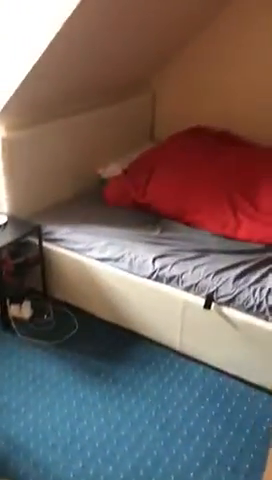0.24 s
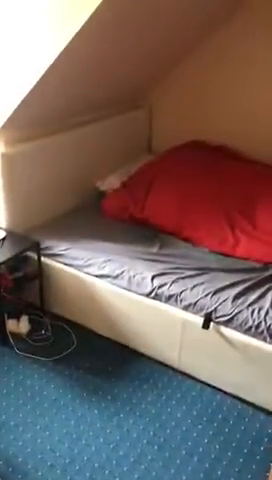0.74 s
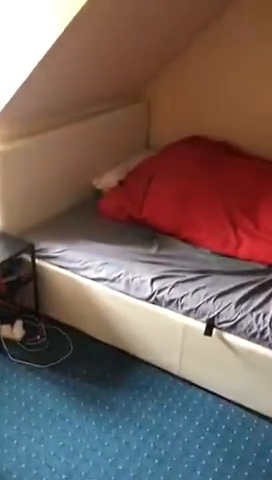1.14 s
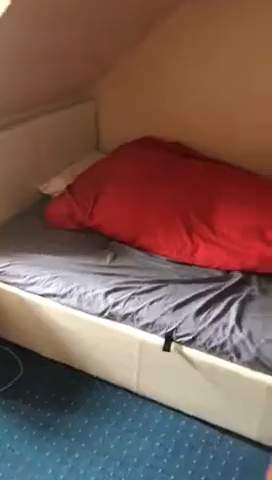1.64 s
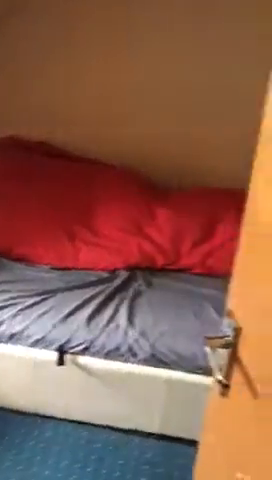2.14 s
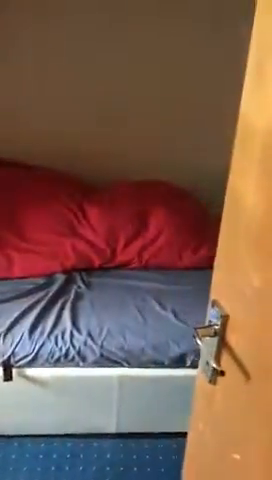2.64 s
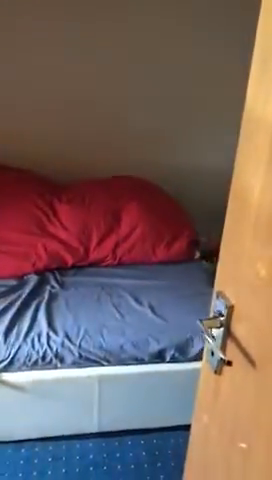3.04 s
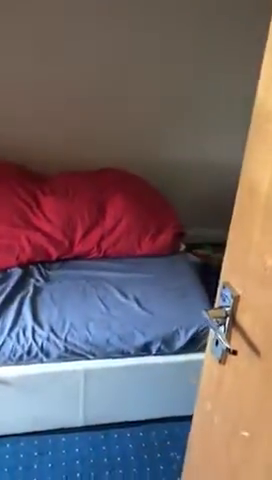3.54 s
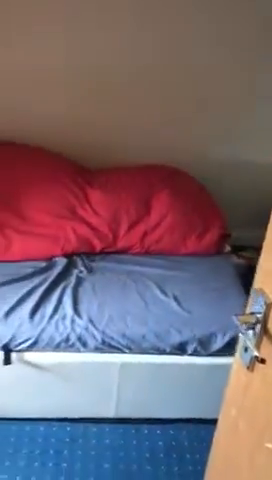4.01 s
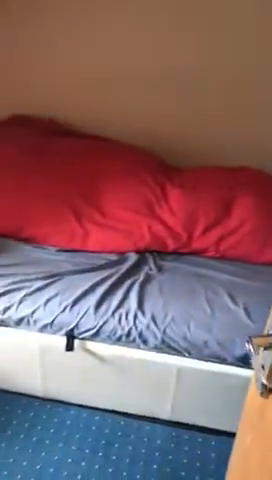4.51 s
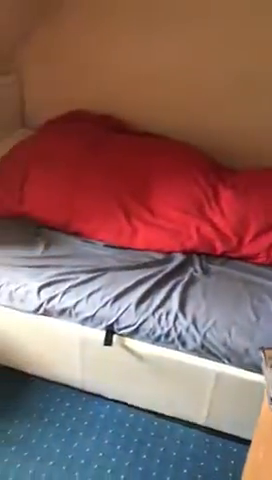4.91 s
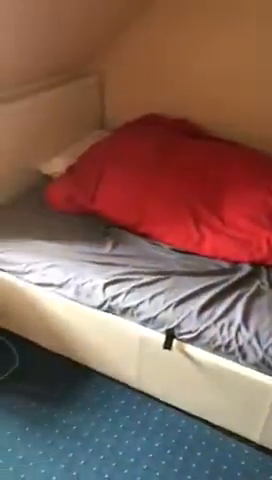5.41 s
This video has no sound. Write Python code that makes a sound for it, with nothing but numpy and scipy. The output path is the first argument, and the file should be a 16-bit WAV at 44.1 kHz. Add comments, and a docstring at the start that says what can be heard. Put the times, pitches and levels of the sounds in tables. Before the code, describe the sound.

For the first 1.5 seconds, footsteps climb carpeted wooden stairs a little way off, the treads knocking hollowly and groaning low under the weight. Around 0.8 seconds a few small knocks and a rub sound right at the microphone, and a light snap follows at 1.2. Cloth brushes softly throughout, most clearly near 1.9 seconds. From about 2.1 to 2.8 seconds, louder heel thuds come in a quick cluster on a carpeted bedroom floor, each with a short boom and a low timber rumble. A door handle ticks faintly at 3 seconds, and two more steps land at about 3.3 and 3.5. After a lull, something snaps sharply at 4.5 seconds, followed by the last dull steps between 4.7 and 5. The room sounds small, with a faint murmur of still air until the end at about 5.5 seconds.

```python
"""Footsteps up carpeted stairs and across a bedroom

Wooden treads knock hollowly at a distance and groan under load. In the small carpeted bedroom each
heel sends a thud through the joist floor, which booms back a moment later; the timbers rumble.
Cloth brushes, a few small knocks sound right at the microphone, something snaps and a door handle
ticks, over the murmur of still air."""
import sys
import numpy as np
from scipy import signal
from scipy.fft import rfft, irfft, next_fast_len
from scipy.io import wavfile
from scipy.ndimage import uniform_filter1d

SR = 44100
rng = np.random.default_rng(int(sys.argv[2]) if len(sys.argv) > 2 else 0)


def materialize(psi):
    """Save the field psi as 16-bit PCM at rate SR to the path in sys.argv[1].

    A 1-D psi becomes a single channel; in a 2-D psi each row is a channel.
    """
    bounded = np.clip(np.atleast_2d(psi).T, -1, 1)
    quanta = np.round(bounded * 32767).astype(np.int16)
    wavfile.write(sys.argv[1], SR, quanta)


N = 249601
TIME_S = np.arange(N) / SR
RING_S = TIME_S[:next_fast_len(SR // 2)]   # time axis of one blow


def from_db(db):
    """Decibels to gain."""
    return np.exp(np.asarray(db) * (np.log(10) / 20))


def rms_one(x):
    """Scale to unit rms."""
    return x / np.sqrt(np.mean(x ** 2) + 1e-20)


def at_hz(points, hz):
    """Read a table on a log-frequency axis."""
    freq_hz, value = np.transpose(points)
    return np.interp(np.log(np.maximum(hz, 1)), np.log(freq_hz), value)


def add(out, start_s, sound):
    """Mix a sound in at start_s."""
    i = max(round(start_s * SR), 0)
    out[i:i + len(sound)] += sound[:N - i]


def low_pass(x, hz):
    """Second-order treble cut: the softer the contact, the lower the corner."""
    return signal.sosfilt(signal.butter(2, min(hz, .45 * SR), fs=SR, output="sos"), x)


def high_pass(x, hz):
    """Second-order bass cut."""
    return signal.sosfilt(signal.butter(2, hz, "high", fs=SR, output="sos"), x)


def noise(spectrum, size):
    """Steady noise of a given spectral shape, rms 1."""
    padded = next_fast_len(size, True)
    hz = np.fft.rfftfreq(padded, 1 / SR)
    phases = np.exp(2j * np.pi * rng.random(len(hz)))
    return rms_one(irfft(phases * from_db(at_hz(spectrum, hz)), padded)[:size])


def swell(peak_s, rise_s, fall_s):
    """Stroke envelope: exponential rise and fall, given as time constants."""
    exponent = np.minimum((TIME_S - peak_s) / rise_s, (peak_s - TIME_S) / fall_s)
    return np.exp(np.maximum(exponent, -40))


def wave(pitch_hz, level_db, arrival_s, swell_s):
    """Heavily damped bending wave: arrives, peaks swell_s later, fades."""
    age_s = np.maximum(RING_S[RING_S < arrival_s + 10 * swell_s] - arrival_s, 0)
    envelope = (age_s / swell_s * np.exp(1 - age_s / swell_s)) ** 2
    packet = from_db(level_db) * envelope * np.sin(2 * np.pi * pitch_hz * age_s)
    return np.pad(packet, (0, len(RING_S) - len(age_s)))


def struck(waves, detune, vary_db):
    """Each blow lands on another spot, so every wave varies in pitch and strength."""
    scatter = rng.standard_normal((len(waves), 2))
    return sum(wave(pitch_hz * (1 + detune * a), level_db + vary_db * b, arrival_s, swell_s)
               for (pitch_hz, level_db, arrival_s, swell_s), (a, b) in zip(waves, scatter))


# Room decay: band_hz, t60_s
ROOM_DECAY = [(60, 0.68), (150, 0.42), (350, 0.29), (700, 0.2), (1500, 0.18), (4000, 0.15), (12000, 0.15)]

def room_tails(spectrum, build_s, count):
    """Dense reflections, one row per blow: they build up, then each band dies at its own rate."""
    size = len(RING_S)
    spectra = rfft([noise(spectrum, size) for _ in range(count)])
    hz = np.fft.rfftfreq(size, 1 / SR)
    bands_hz, t60s_s = np.transpose(ROOM_DECAY)
    tails = np.zeros((count, size))
    for t60_s, share in zip(t60s_s, np.eye(len(t60s_s))):
        band = irfft(spectra * at_hz(np.c_[bands_hz, share], hz), size)
        tails += band * from_db(-60 * RING_S / t60_s)
    return tails * (1 - np.exp(-RING_S / build_s))


# Air and hiss: freq_hz, density_db
AIR_SPECTRUM = [(25, -15), (45, -20), (65, -11.5), (90, -3), (130, -5.5), (190, -4.5), (260, -2.5),
                (400, -7), (620, -8), (1000, -12), (1600, -16.5), (4000, -27), (8000, -26), (12000, -30)]

def still_air(level_db):
    """Even murmur of the house's air, plus microphone hiss."""
    return from_db(level_db) * noise(AIR_SPECTRUM, N)


# Soft low thumps and the fading rumble of a footstep: start_s, level_db
LOW_THUMPS = [(0, -56), (.91, -64), (1.83, -61.5), (3.65, -59), (4.0, -65), (4.8, -53.5), (5.08, -68)]
# Timber rumble: freq_hz, density_db
RUMBLE_SPECTRUM = [(20, -16), (45, -4.5), (70, 2.5), (110, -0.5), (150, -5), (250, -18.5), (600, -61)]

def timbers(rest_db, step_gain_db, load_gain_db, attack_s, t60_s):
    """Every footfall, soft thump and loaded tread stirs a low rumble in the house."""
    pushes = [(start_s, level_db + boom_db + step_gain_db)
              for start_s, level_db, _, boom_db, _ in FOOTFALLS]
    power = from_db(rest_db) ** 2 + (from_db(load_gain_db) * tread_load()) ** 2
    for start_s, level_db in pushes + LOW_THUMPS:
        age_s = np.maximum(TIME_S - start_s, 0)
        attack = 1 - np.exp(-age_s / attack_s)
        power += (attack * from_db(level_db - 60 * age_s / t60_s)) ** 2
    return np.sqrt(power) * noise(RUMBLE_SPECTRUM, N)


# Weight on a tread: start_s, length_s, level_db
TREAD_LOADS = [(0.059, .15, -49.5), (0.397, .3, -52), (1.087, .29, -54), (1.486, 0.046, -55)]

def tread_load(attack_s=0.046, release_db_per_s=209):
    """Envelope of weight on the stairs: comes on, stays, is lifted."""
    load = np.zeros(N)
    for start_s, length_s, level_db in TREAD_LOADS:
        attack = np.clip((TIME_S - start_s) / attack_s, 0, 1)
        lifted_s = np.maximum(TIME_S - start_s - length_s, 0)
        load += attack * from_db(level_db - release_db_per_s * lifted_s)
    return load


# Tread knocks: start_s, level_db, contact_cutoff_hz, room_db
TREAD_KNOCKS = [(0.041, -52.5, 1270, 11.5), (0.061, -40.5, 1980, 8.5), (0.103, -38.5, 4000, 4),
                (0.132, -36, 1280, 4.5), (.165, -36.5, 1230, 2.5), (0.405, -43.5, 1410, 3.5),
                (.440, -52, 1230, 16.5), (.454, -30, 1600, 1), (.513, -38, 1260, 4.5),
                (.571, -35.5, 1770, 1), (.648, -27.5, 1350, -0.5), (.787, -50.5, 1200, 5),
                (1.042, -46.5, 1630, 2), (1.207, -46, 5000, 6), (1.308, -45.5, 1220, 3),
                (1.343, -43, 1910, 5.5), (1.502, -52.5, 2920, 11)]
# Tread bending waves: pitch_hz, level_db, arrival_s, swell_s
TREAD_BENDING = [(490, 1, .0005, .0022), (700, -6, .001, .0028), (490, -11, .008, .008),
                 (290, -19, 0, .009), (950, -14, 0, .0012), (155, -20, 0, .008)]
# Tread groan: freq_hz, density_db
GROAN_SPECTRUM = [(47, -36), (80, -11), (194, -3), (269, 5.5), (382, -14.5), (463, -14.5), (513, -17),
                  (581, -12.5), (1200, -27.5), (1560, -49), (2640, -120)]
# Stairwell reflections: freq_hz, density_db
STAIRWELL_SPECTRUM = [(30, -33), (70, -49), (140, -0.5), (220, -6.5), (320, 1.5), (500, -0.5), (750, -2.5),
                      (1100, -12), (1600, -15.5), (3000, -14), (6000, -19.5), (12000, -13.5)]

def stairs(tail_db):
    """Treads knock in the stairwell and groan while they carry weight."""
    out = tread_load() * noise(GROAN_SPECTRUM, N)
    tails = room_tails(STAIRWELL_SPECTRUM, build_s=0.0012, count=len(TREAD_KNOCKS))
    for (start_s, level_db, cutoff_hz, room_db), tail in zip(TREAD_KNOCKS, tails):
        knock = struck(TREAD_BENDING, detune=0.045, vary_db=1.6)
        room = from_db(tail_db + room_db) * tail
        add(out, start_s, from_db(level_db) * low_pass(knock + room, cutoff_hz))
    return out


# Strokes of cloth and socks: peak_s, rise_s, fall_s, brush_db, rustle_db
CLOTH_STROKES = [(.13, 0.035, 0.063, -69, -77), (.852, .035, 0.04, -65, -90), (1.34, 0.066, 0.11, -70, -79),
                 (1.508, 0.013, 0.025, -70.5, -66), (1.854, 0.029, 0.02, -52.5, -76),
                 (2.7, 0.34, 0.19, -81, -82.5), (3.58, 0.044, 0.053, -70.5, -74.5),
                 (3.94, 0.067, 0.039, -73.5, -83), (4.85, 0.13, 0.1, -81, -105)]
# Soft brush: freq_hz, density_db
BRUSH_SPECTRUM = [(240, -56), (400, -13), (604, -2.5), (1000, -7.5), (1400, -14.5), (2200, -4.5),
                  (3300, -3.5), (5040, -5), (5810, -9), (10700, -25.5), (12000, -40), (15600, -63)]
# Crisp rustle: freq_hz, density_db
RUSTLE_SPECTRUM = [(1000, -17), (3000, -13), (6000, -0.5), (10000, -0.5), (12000, -7.5)]

def cloth(grain_db, brush_rest_db, rustle_rest_db):
    """Cloth, never quite still, brushes and rustles; fibres catch and let go, making the hiss grainy."""
    flutter = rms_one(uniform_filter1d(rng.standard_normal(N), size=90))
    grain = rms_one(from_db(grain_db * flutter))
    brush, rustle = from_db(brush_rest_db), from_db(rustle_rest_db)
    for peak_s, rise_s, fall_s, brush_db, rustle_db in CLOTH_STROKES:
        speed = swell(peak_s, rise_s, fall_s)
        brush = brush + from_db(brush_db) * speed
        rustle = rustle + from_db(rustle_db) * speed
    return grain * (brush * noise(BRUSH_SPECTRUM, N) + rustle * noise(RUSTLE_SPECTRUM, N))


# Knocks at the microphone: start_s, level_db, low_edge_hz, contact_cutoff_hz
CASING_KNOCKS = [(0.742, -52.5, 1300, 4000), (0.8193, -44, 950, 11400), (0.8624, -31, 45, 12000)]
# Casing rings: pitch_hz, level_db, arrival_s, swell_s
CASING_RINGS = [(8360, -3.5, .0003, 0.000061), (4020, -4, 0, 0.00038), (2280, -5, 0.0018, .0005),
                (1220, -3, 0.000098, 0.00091), (600, 5, .004, 0.001), (264, -10.5, .003, 0.0033),
                (111, -8, 0.013, 0.0037)]
# Rub into the hardest knock: freq_hz, density_db
RUB_SPECTRUM = [(300, -22), (650, -5), (850, 12), (1100, -8.5), (1600, -21), (5000, -29), (12000, -42)]

def close_knocks(rub_db):
    """A rub and taps on a casing, too near to carry any room; the lighter the touch, the less bass."""
    out = from_db(rub_db) * swell(peak_s=0.861, rise_s=0.006, fall_s=0.002) * noise(RUB_SPECTRUM, N)
    for start_s, level_db, low_edge_hz, cutoff_hz in CASING_KNOCKS:
        ring = high_pass(struck(CASING_RINGS, detune=0.09, vary_db=3.04), low_edge_hz)
        add(out, start_s, from_db(level_db) * low_pass(ring, cutoff_hz))
    return out


# Snaps in the room: start_s, level_db, room_db, ping_db
SHARP_SNAPS = [(1.209, -47.5, -21, -29), (4.4785, -31.5, -8, -21), (4.4807, -32.5, -11.5, 8),
               (4.967, -58, -16, -20)]
# Snap and its reflections: freq_hz, density_db
SNAP_SPECTRUM = [(60, -18), (140, 1), (270, -1), (420, -10.5), (650, -3.5), (1050, -3), (1550, -13.5),
                 (2300, -3.5), (3300, -2), (4500, -2.5), (6000, -7.5), (8500, -15.5), (12000, -23.5)]

def snaps(crack_s, ping_hz):
    """A brief bright crack with a short ping, then the room."""
    out = np.zeros(N)
    tails = room_tails(SNAP_SPECTRUM, build_s=0.0012, count=len(SHARP_SNAPS))
    for (start_s, level_db, room_db, ping_db), tail in zip(SHARP_SNAPS, tails):
        crack = noise(SNAP_SPECTRUM, len(RING_S)) * np.exp(-RING_S / crack_s)
        ping = wave(ping_hz, ping_db, arrival_s=0, swell_s=0.00036)
        add(out, start_s, from_db(level_db) * (crack + ping + from_db(room_db) * tail))
    return out


# Bedroom footfalls: start_s, level_db, contact_cutoff_hz, boom_db, room_db
FOOTFALLS = [(2.0709, -46.5, 675, 1, 3), (2.094, -31, 745, 7, 0), (2.1378, -30, 752, 5.5, 0),
             (2.222, -50.5, 1020, 10, 16), (2.3924, -23.5, 4300, 2, 1), (2.5241, -25.5, 2900, 1, 1.5),
             (2.624, -28, 2010, 1.5, 1.5), (2.754, -26.5, 2520, -3.5, 2), (2.8273, -32.5, 880, 0.5, 3),
             (3.2532, -30.5, 1340, 1.5, 2.5), (3.5366, -31.5, 1390, 0.5, 4), (4.664, -27, 1830, 1.5, 1.5),
             (4.7306, -29.5, 1010, 4.5, -0.5), (4.9645, -29.5, 1380, 2, 1.5)]
# Heel crack: freq_hz, density_db
HEEL_SPECTRUM = [(80, -44), (500, 2), (1200, -1), (2300, 1.5), (3100, 2), (6000, -4.5), (12000, -7.5)]
# Floor waves passing the microphone: pitch_hz, level_db, arrival_s, swell_s
FLOOR_THUD = [(189, -21, 0, 0.00081), (326, 1, 0, .003), (585, -4, .0033, .0027), (488, -24, .009, 0.0079),
              (621, -13, .013, 0.0063), (833, -9, 0, 0.00078), (1082, -28.5, 0.0011, 0.0053),
              (3050, -14.5, 0.0017, .0009), (3210, -30.5, .0042, .0037)]
# Slow joist waves returning from the walls: pitch_hz, level_db, arrival_s, swell_s
JOIST_BOOM = [(73.4, -30, .001, 0.067), (112, -21, 0.013, 0.013), (164.6, -19, 0.0074, 0.015),
              (143, -9, 0.0323, 0.0084)]
# Bedroom standing waves: pitch_hz, level_db, t60_s
BEDROOM_MODES = [(73.8, -36.5, 0.58), (140, -25, 0.52), (205.8, -28, 0.47), (276, -37, 0.14),
                 (325.2, -11, 0.19), (365, -33, 0.48), (387, -39.5, 0.67), (474, -31, 0.33),
                 (497, -21.5, 0.16), (525, -41, 0.13), (591, -27.5, 0.35), (629, -18, 0.16),
                 (686, -22.5, 0.17), (934, -23.5, 0.16), (1070, -23.5, 0.1), (1917, -26, 0.078),
                 (2790, -25.5, 0.083), (3300, -46, 0.28), (3560, -42, 0.12)]
# Bedroom reflections: freq_hz, density_db
BEDROOM_SPECTRUM = [(25, -32), (50, -9), (100, 0), (210, -3.5), (320, 0), (450, -1.5), (620, 1),
                    (800, -3.5), (1100, -9.5), (1500, -14), (2000, -11.5), (2500, -17), (3100, -19),
                    (4500, -20), (12000, -40)]

def footsteps(shared_tail_db, spot_tail_db, crack_db, crack_s, mode_build_s):
    """Heel on carpet: a faint crack, the floor's thud, the joists' boom and the room's answer."""
    out = np.zeros(N)
    modes = sum(from_db(level_db - 60 * RING_S / t60_s) * np.sin(2 * np.pi * pitch_hz * RING_S)
                for pitch_hz, level_db, t60_s in BEDROOM_MODES)
    modes *= 1 - np.exp(-RING_S / mode_build_s)
    # Some echoes stay the same, others change with the spot.
    shared_tail, *spot_tails = room_tails(BEDROOM_SPECTRUM, build_s=0.008, count=len(FOOTFALLS) + 1)
    for (start_s, level_db, cutoff_hz, boom_db, room_db), spot_tail in zip(FOOTFALLS, spot_tails):
        crack = from_db(crack_db) * noise(HEEL_SPECTRUM, len(RING_S)) * np.exp(-RING_S / crack_s)
        thud = struck(FLOOR_THUD, detune=0.008, vary_db=0.8)
        boom = from_db(boom_db) * struck(JOIST_BOOM, detune=0.023, vary_db=0.7)
        room = modes + from_db(shared_tail_db) * shared_tail + from_db(spot_tail_db) * spot_tail
        step = crack + thud + boom + from_db(room_db) * room
        add(out, start_s, from_db(level_db) * low_pass(step, cutoff_hz))
    return out


# Handle rings: pitch_hz, level_db, arrival_s, swell_s
HANDLE_RINGS = [(2520, -61, 0, 0.0036), (1270, -44.5, 0.0024, 0.00075), (500, -52, 0, 0.0016)]

def door_handle(start_s):
    """One light metal tick with a thin ring."""
    out = np.zeros(N)
    add(out, start_s, sum(wave(*ring) for ring in HANDLE_RINGS))
    return out


def scene():
    """All sources at one microphone."""
    mix = stairs(tail_db=-6.5)
    mix += footsteps(shared_tail_db=-19.5, spot_tail_db=-13.5,
                     crack_db=-14, crack_s=0.0031, mode_build_s=0.0032)
    mix += snaps(crack_s=0.0011, ping_hz=3300)
    mix += close_knocks(rub_db=-38)
    mix += door_handle(start_s=3.047)
    mix += cloth(grain_db=1.5, brush_rest_db=-83.5, rustle_rest_db=-85.5)
    mix += timbers(rest_db=-76, step_gain_db=-40, load_gain_db=-22, attack_s=0.005, t60_s=0.77)
    mix += still_air(level_db=-70.5)
    return mix[None]


def record(dry):
    """The microphone thins the deep bass; the top is cut at 12 kHz."""
    top_cut = signal.ellip(10, 0.2, 70, 12000, fs=SR, output="sos")
    return signal.sosfilt(top_cut, high_pass(dry, hz=35))


dry = scene()
out = record(dry)
materialize(out)
```